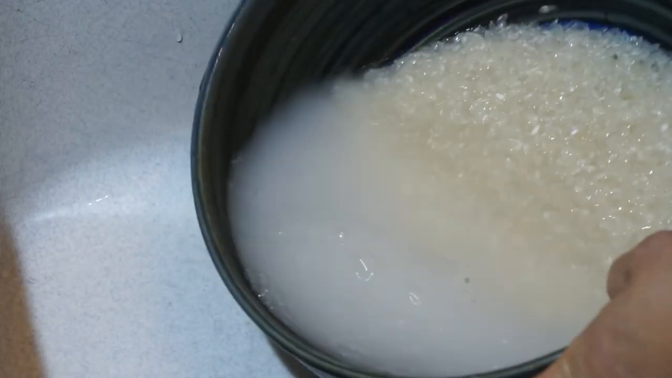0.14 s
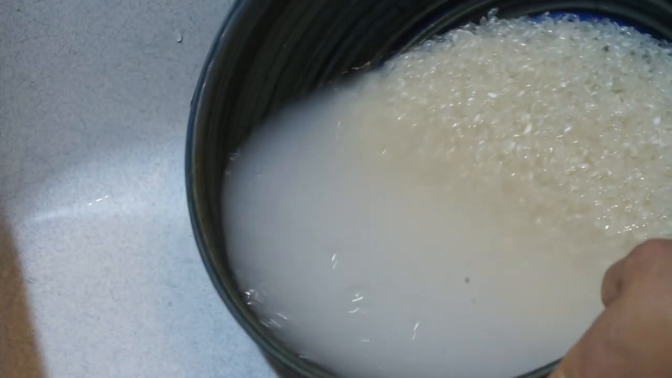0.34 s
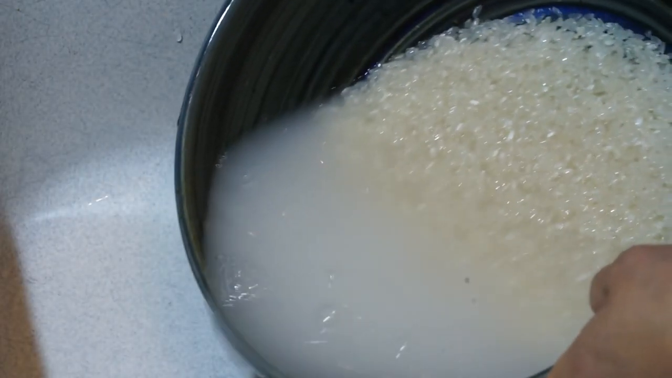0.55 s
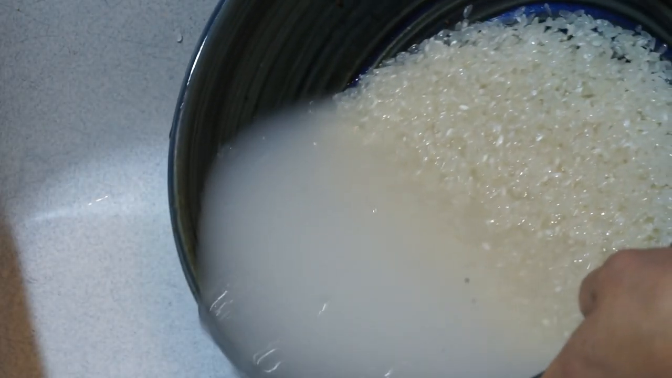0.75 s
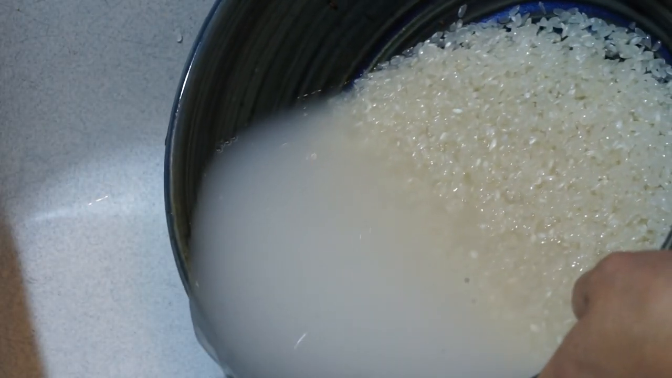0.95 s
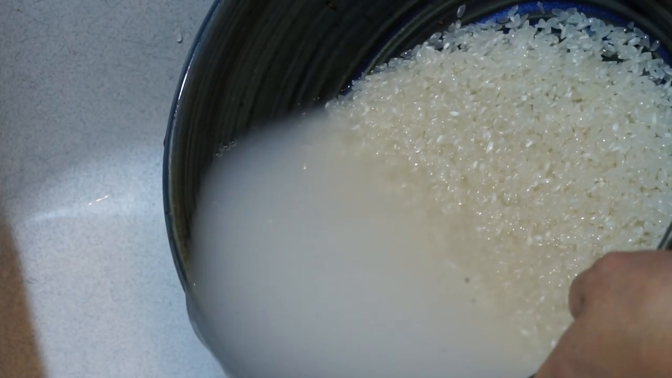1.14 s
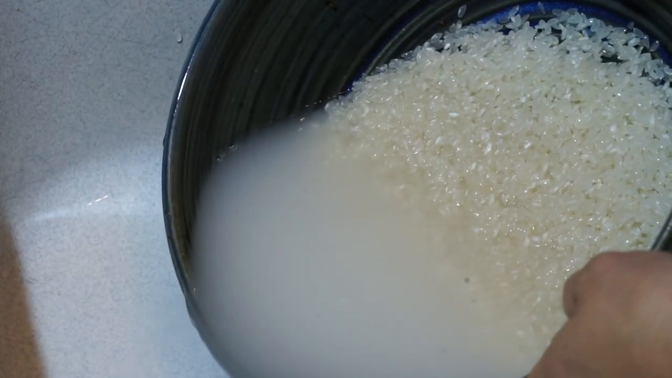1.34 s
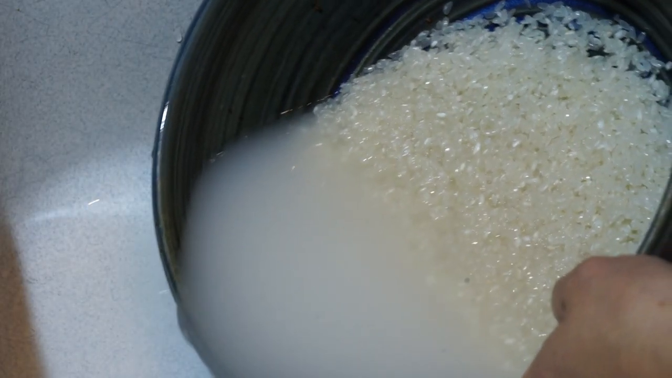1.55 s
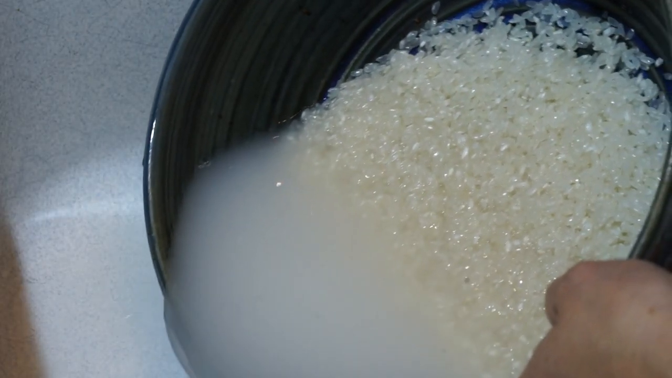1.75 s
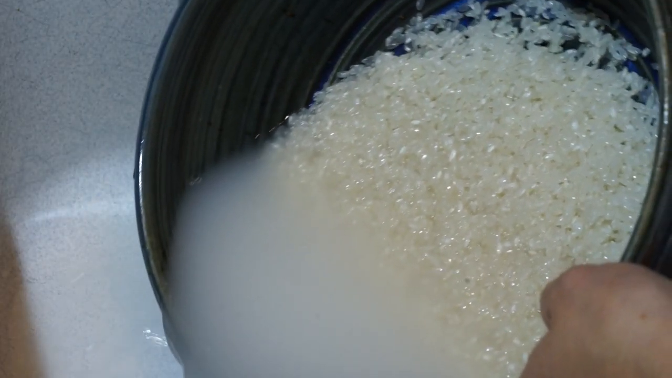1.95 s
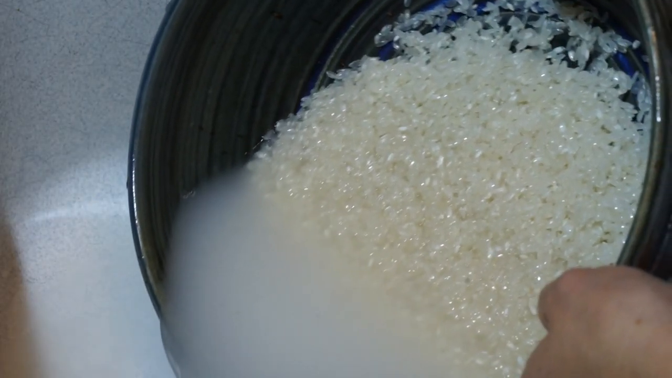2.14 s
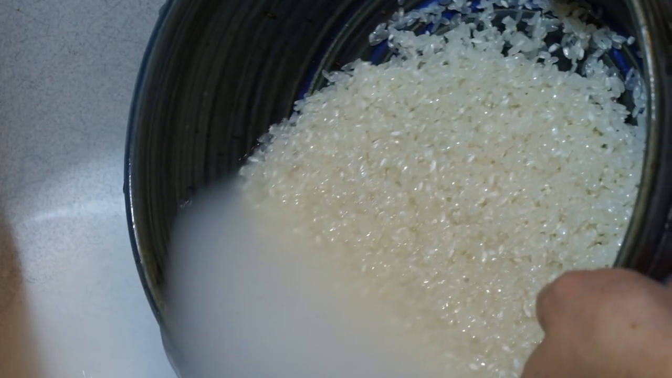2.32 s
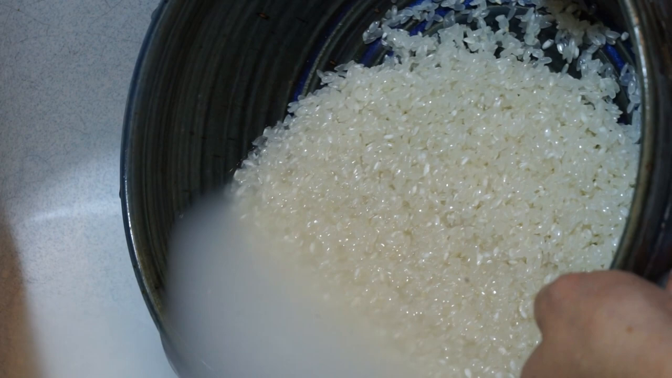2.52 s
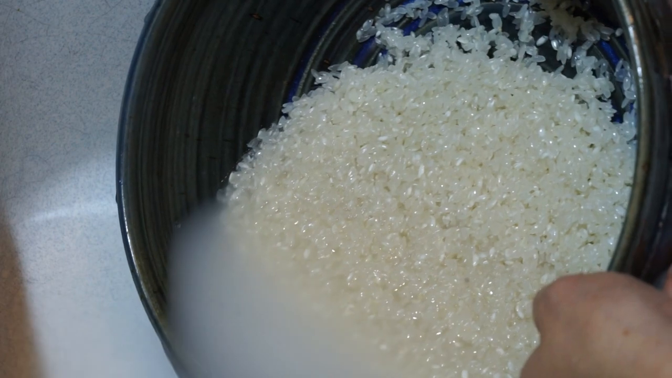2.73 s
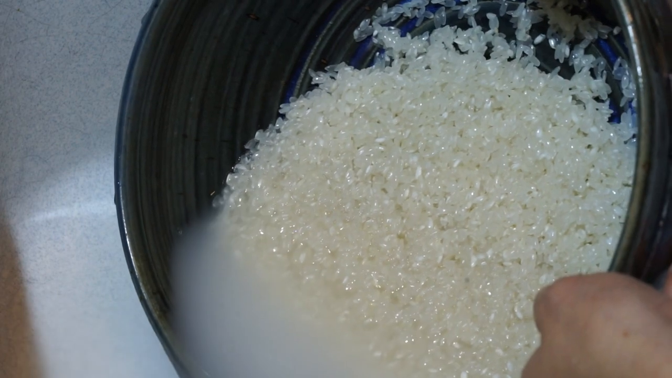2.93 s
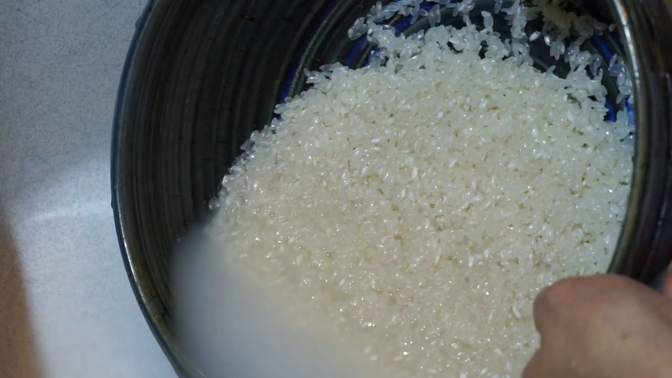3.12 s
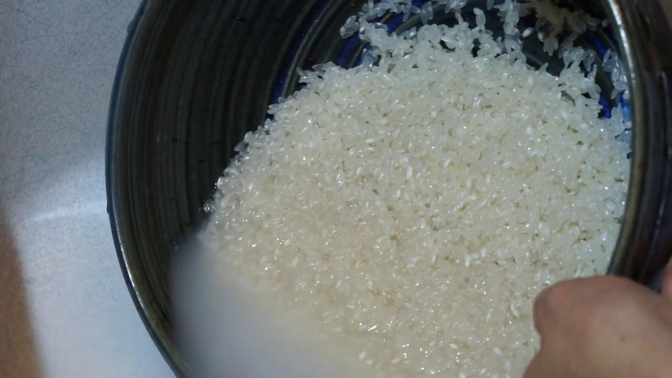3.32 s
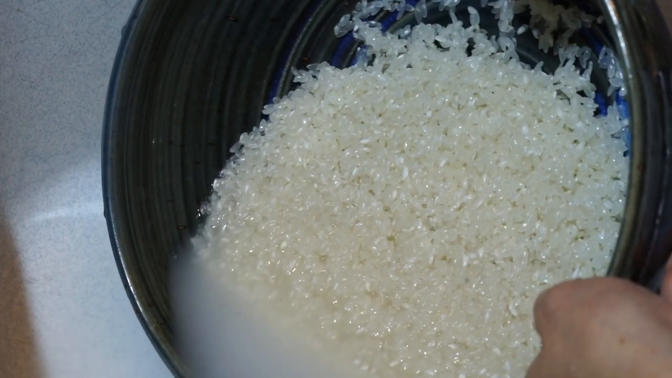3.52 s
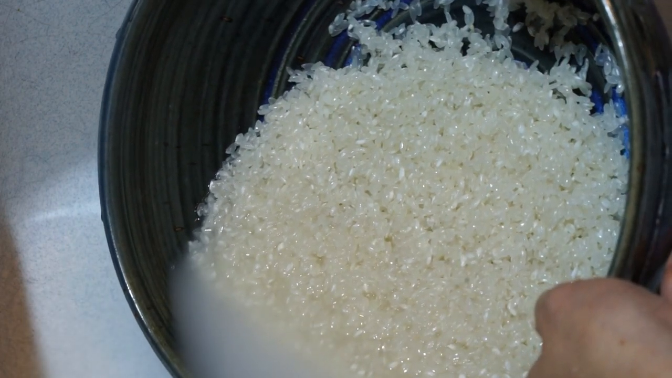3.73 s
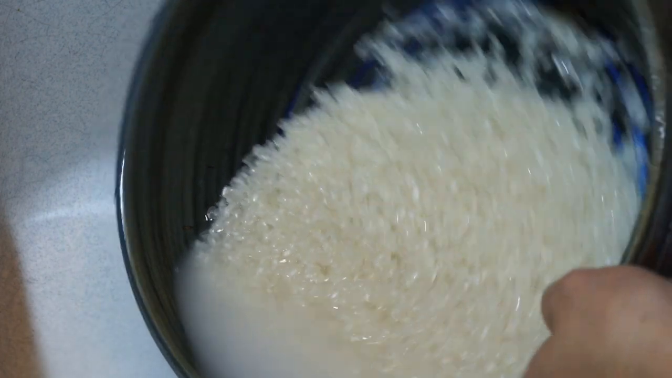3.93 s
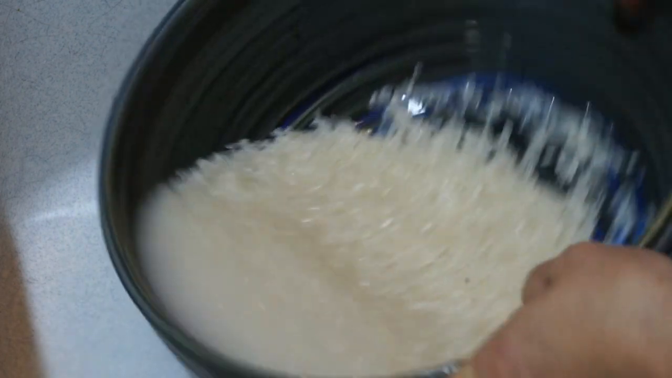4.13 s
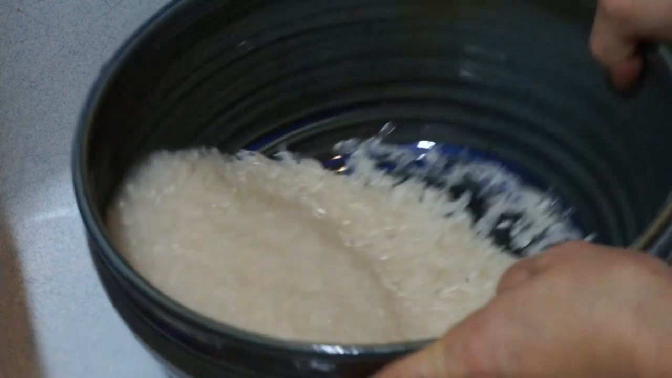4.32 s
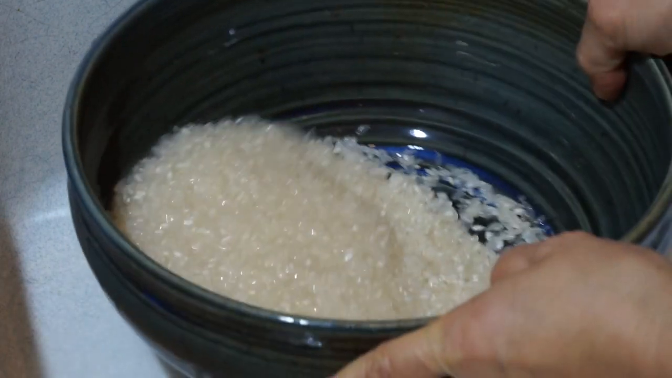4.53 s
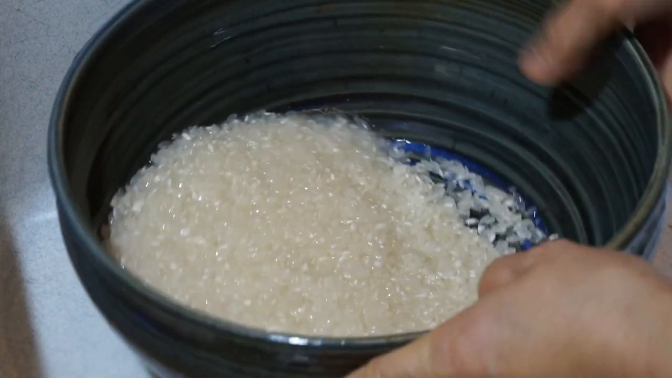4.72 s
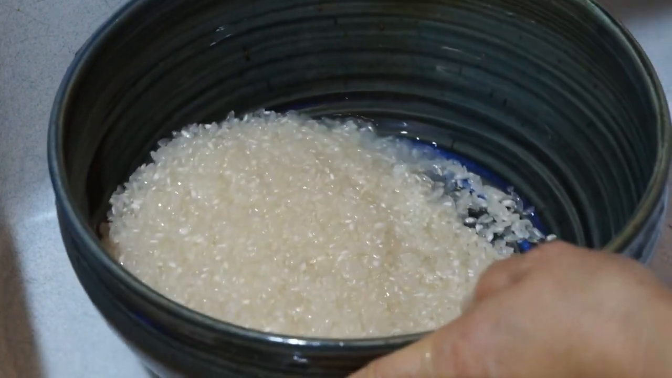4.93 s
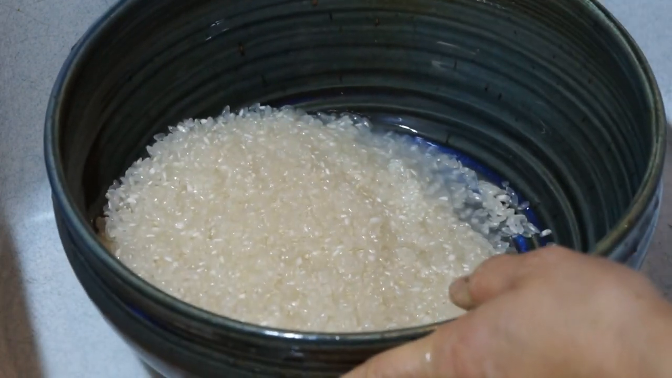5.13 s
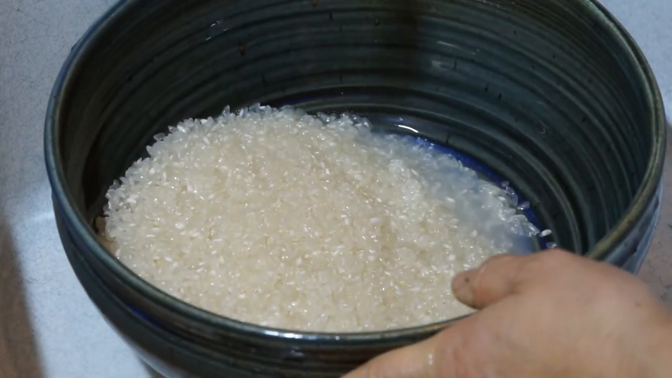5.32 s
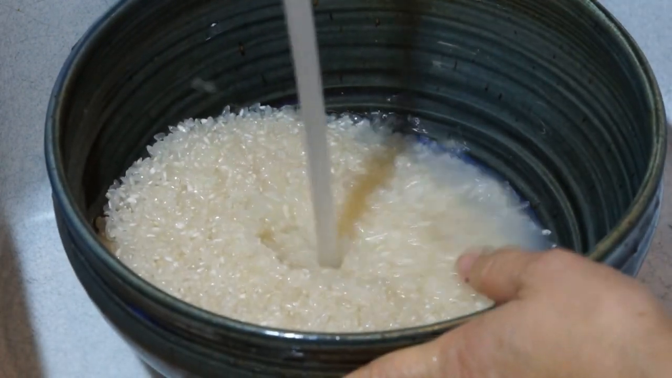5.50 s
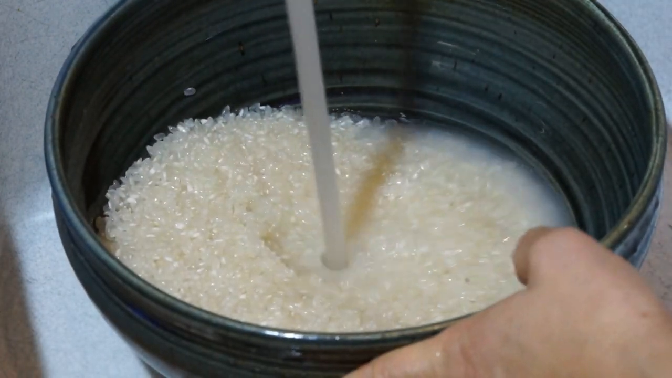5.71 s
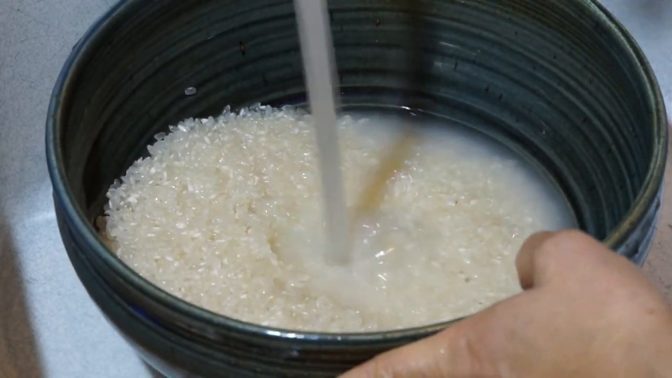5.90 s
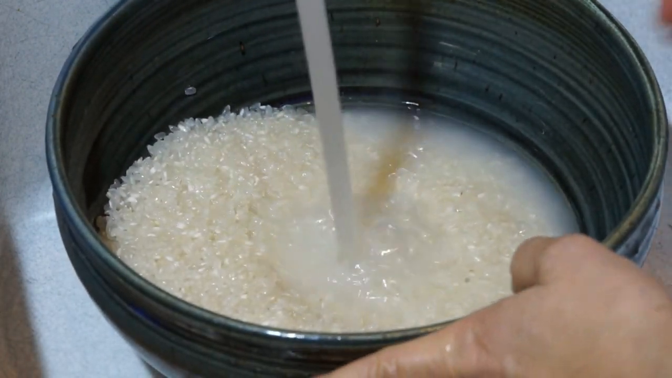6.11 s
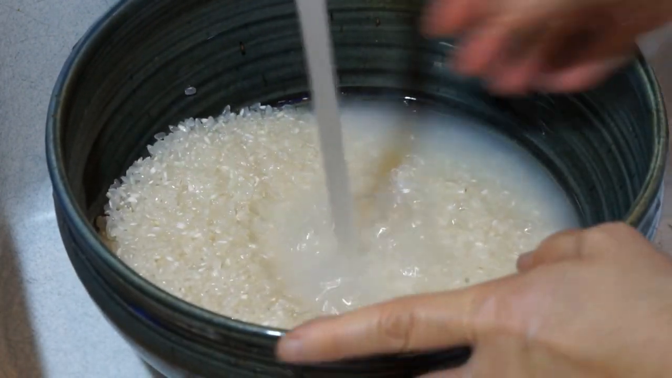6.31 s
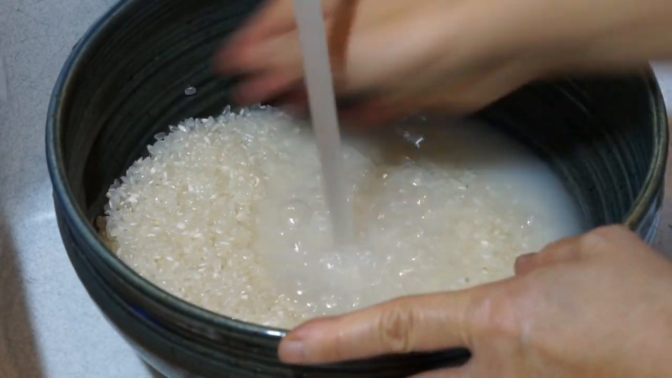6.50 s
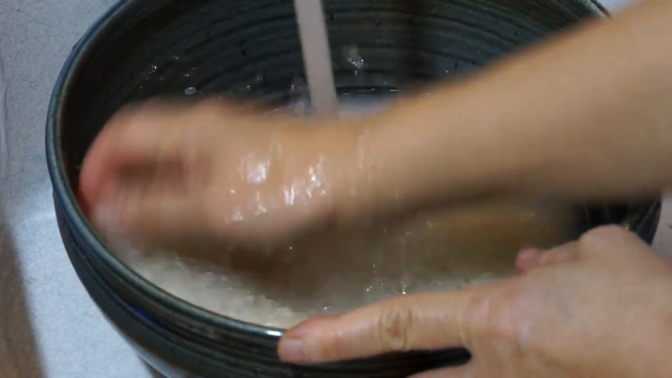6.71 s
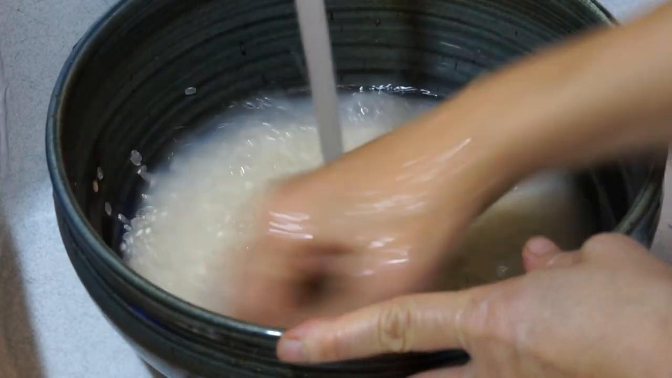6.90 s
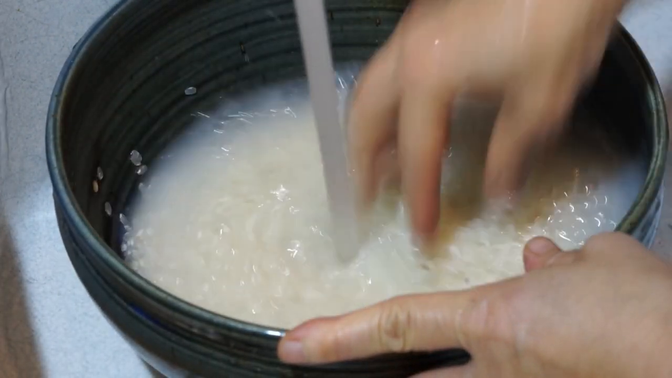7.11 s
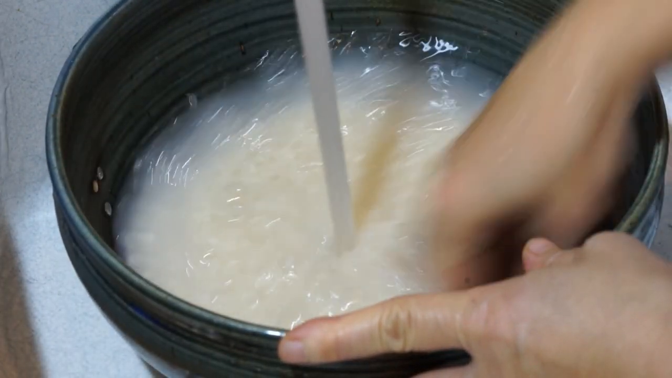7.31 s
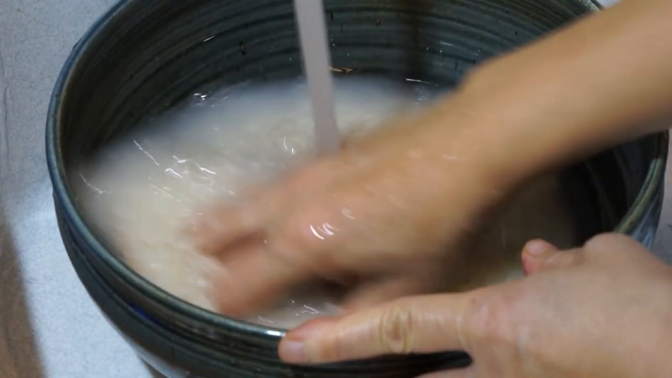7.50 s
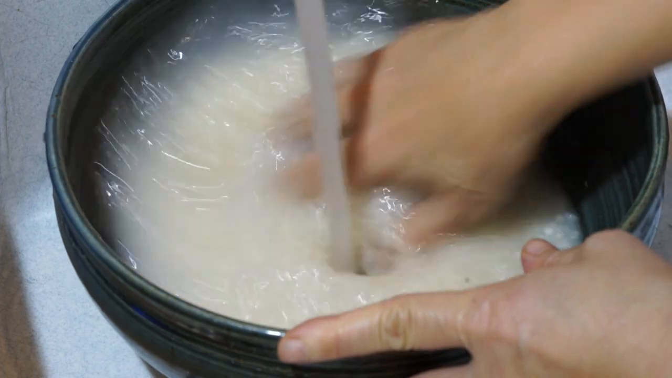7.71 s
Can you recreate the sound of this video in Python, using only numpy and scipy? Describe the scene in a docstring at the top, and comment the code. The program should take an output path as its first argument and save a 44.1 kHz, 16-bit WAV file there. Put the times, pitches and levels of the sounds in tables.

```python
"""Rice water is tipped from a ceramic bowl into a sink: patter, spray, bubbling drops and a gurgling drain.
The bowl knocks and drags on the basin, whose ringing modes are struck by noise and grit.
After a faint tick the tap runs into the rice as hiss, boom and bowl ring; a hand swishes, with splashes.
A close stereo microphone in a quiet kitchen also hears a sine hum that stops, and faint air noise."""
import sys
import numpy as np
from scipy import signal
from scipy.fft import rfft, irfft
from scipy.io import wavfile
from scipy.ndimage import uniform_filter1d

SR = 44100
rng = np.random.default_rng(int(sys.argv[2]) if len(sys.argv) > 2 else 0)


def inscribe(sig):
    """Save sig as 16-bit PCM at rate SR to the path in sys.argv[1].

    A 1-D sig is mono; a 2-D sig holds one channel per row.
    Samples are clipped to [-1, 1] before scaling.
    """
    pcm = np.round(np.clip(np.atleast_2d(sig).T, -1, 1) * 32767)
    wavfile.write(sys.argv[1], SR, pcm.astype(np.int16))


N = 341775

# Water poured close to the microphone, then wet grains slipping; common level of patter, spray and ticks:
# time_s, level_db
POUR = [(0.62, -100), (0.72, -75), (0.98, -59), (1.07, -64), (1.3, -60.5), (1.55, -72.5), (1.75, -62),
        (2.05, -57.5), (2.85, -59), (3.1, -66.5), (3.85, -64), (4.45, -75.5), (5.2, -77)]


def pour():
    """Small drops patter in clumps over a fine spray, with sharp ticks."""
    gate, db = follow(POUR)
    clumps = gain_of(3.5 * evened(uniform_filter1d(rng.standard_normal(N), size=1500)))
    spray_colour = [(600, -5.0), (2500, 1.0), (6000, -7.0), (16000, -14.0)]  # (Hz, dB)
    spray = noise(spray_colour, patchy_db=6, flicker_db=3.0)
    patter = evened(clumps * fizz(900, 6000, per_s=2200, cycles=10, spread_db=3.3))
    sharp = ticks(per_s=70, spread_db=3.2, fade_s=0.02)
    return gate * gain_of(db) * (gain_of(-5) * patter + 0.82 * spray + gain_of(-5) * sharp)


def ticks(per_s, spread_db, fade_s):
    """Droplets burst in the sink: short wide puffs with a sharp start."""
    fade = np.exp(-np.arange(5000) / SR / fade_s)
    bursts = abs(signal.oaconvolve(abs(grit(per_s, spread_db)), fade)[:N])
    puff_colour = [(1500, -17.5), (4000, -2.0), (9000, -7.5), (16000, -7)]  # (Hz, dB)
    return evened(bursts * noise(puff_colour, patchy_db=4.5, flicker_db=6.0))


# Single drops landing in the sink, close by; the last row is a small knock's tick:
# start_s, level_db (of the main bubble or tone), pitch_hz (at its start)
DROPS = [(0.694, -55, 4330), (0.7474, -51, 4400), (0.765, -48, 4920), (0.7955, -46.5, 2820),
         (0.87, -52, 967), (0.9106, -42.5, 1040), (0.925, -45, 4500), (0.9453, -44.5, 1406),
         (0.997, -44, 6700), (1.088, -51, 2660), (1.1488, -47.5, 2000), (1.1697, -40.5, 4970),
         (1.1826, -37.5, 1780), (1.217, -45, 8060), (1.276, -45, 3470), (1.3488, -44.5, 3380),
         (1.38, -47, 8300), (1.4045, -38.5, 1903), (1.43, -39.5, 3520), (1.472, -41, 3970),
         (1.477, -46, 6250), (1.7407, -45, 5000), (1.804, -33.5, 1753), (1.8745, -36.5, 3000),
         (1.8987, -43.5, 2170), (1.9325, -45, 2420), (1.9906, -40.5, 3000), (2.0188, -46, 1230),
         (2.226, -39, 3120), (2.35, -41, 2860), (2.816, -40, 2790), (3.5435, -50, 3040), (3.686, -47, 4110),
         (3.8092, -46.5, 3020), (4.2065, -49, 1760)]


def drops():
    """Drops in the sink ring as bubbles with a very short spray; a small knock's tick, last, is made alike."""
    return plops(DROPS, cycles=7.8, spray_s=0.0015, spray_db=-20, after_db=-3.5)


# Gulps of air down in the drain: start_s, pop_db, hollow_note_db, gurgle_db (levels before shaping)
GLUGS = [(2.22, -51, -58, -63), (2.332, -53, -64, -57), (2.534, -41, -65, -53.5), (2.665, -13, -49, -51),
         (2.791, -28, -86, -53), (2.851, -30, -74, -76), (3.144, -28, -84, -60), (3.55, -33, -68, -77),
         (3.689, -34, -74, -67)]
# Air column of the drain, rung twice over: pitch_hz, width_hz (of each ring)
DRAIN_NOTE = (186, 25)
# Higher tones of the drain pipe, relative to each other: pitch_hz, width_hz (of the narrow ring), level_db
DRAIN_PIPE = [(275, 28, 2), (516, 23, 7.5), (755, 130, 10.5), (870, 32, 10), (967, 47, 9.5),
              (1365, 180, 6.5), (2740, 130, 7.5)]
DRAIN_START_S, DRAIN_END_S, TRICKLE_DB = 2.05, 3.87, -72.5  # steady gurgle under the gulps
GULP_RISE_S, NOTE_FADE_S, GURGLE_FADE_S = 0.0026, 0.13, 0.076


def drain():
    """Each gulp pops, sets the air column of the drain humming and stirs its higher pipe tones."""
    gate = follow([(DRAIN_START_S,), (DRAIN_END_S,)])[0]
    note_hz = DRAIN_NOTE[0]
    breath = evened(ring(ring(grit(1000, 0.57), *DRAIN_NOTE), *DRAIN_NOTE))
    drive = grit(440, 4.13)
    glugs, hollow, churn = np.zeros(N), 0, gain_of(TRICKLE_DB)
    for s, pop_db, note_db, gurgle_db in GLUGS:
        add(glugs, s, gain_of(pop_db) * bubble(530, 1.03, 0.032))
        hollow = hollow + gain_of(note_db) * swell(s, GULP_RISE_S, NOTE_FADE_S)
        churn = churn + gain_of(gurgle_db) * swell(s, GULP_RISE_S, GURGLE_FADE_S)
    pops = drain_pipe(glugs)
    bubbles = fizz(458.3, 1488, per_s=120, cycles=9.9, spread_db=0.65, count=12)
    gurgle = evened(drain_pipe(drive)) + gain_of(-2.5) * bubbles
    hum_note = 0.31 * breath + np.sin(2 * np.pi * note_hz * np.arange(N) / SR)
    return gate * (hollow * hum_note + churn * gurgle) + pops


def drain_pipe(x):
    """Pipe tones: a narrow resonance, rung again through one five times as wide."""
    return sum(gain_of(db) * ring(ring(x, hz, width), hz, 5 * width) / np.sqrt(width)
               for hz, width, db in DRAIN_PIPE)


# Bowl knocking on the basin, close by: start_s, level_db (drive), depth_db (low drive against the rest)
KNOCKS = [(3.894, -38.5, 11.5), (3.928, -37, -13), (3.944, -27.5, 9), (4.007, -18.5, 4.5), (4.29, -28, -6),
          (4.348, -34.5, -18), (4.703, -30, -33), (4.715, -24.5, -36), (4.729, -23.5, -19),
          (4.745, -31, -25), (4.841, -21, -13), (4.85, -22.5, -24), (5.86, -36.5, -8.5),
          (6.859, -32.5, -31)]


def knocks():
    """Each knock is a crack and a rounded blow, then a judder of the foot; the jolted grains rustle after it."""
    blows, deep, grains, cracks = np.zeros((4, N))
    t = np.arange(14000) / SR
    rise = 1 - np.exp(-t / 0.00033)
    for s, db, depth_db in KNOCKS:
        judder = gain_of(-25) * rng.standard_normal(len(t)) * np.exp(-t / 0.008) * rise
        judder[:40] += 0.041 * np.hanning(40)  # the rounded blow
        rustle = rng.standard_normal(len(t)) * np.exp(-t / 0.049) * rise
        crack = rng.standard_normal(len(t)) * np.exp(-t / 0.004)
        add(blows, s, gain_of(db + 74.0) * judder)
        add(deep, s, gain_of(db + depth_db + 75.5) * judder)
        add(grains, s, gain_of(db - 8.5) * rustle)
        add(cracks, s, gain_of(db - 22.5) * crack)
    dull = signal.butter(2, [70, 6000], "band", fs=SR)
    body = signal.lfilter(*dull, basin(blows + gain_of(43.5) * grains, deep))
    return body + gain_of(-31.5) * ring(grains, 3600, 3700) + ring(cracks, 2500, 2230)


# Bowl's foot dragged over the basin, the first stroke already under way:
# start_s, length_s, level_db (of the ringing), depth_db and rasp_db (against the ringing)
DRAGS = [(-0.08, 0.46, -53.5, 1.5, 4), (1.017, 0.058, -57.5, -1.5, 1.5), (1.539, 0.24, -64, 8, 1),
         (4.336, 0.21, -39.5, -15, -12), (4.426, 0.41, -50.5, -11, -3.5), (4.88, 0.27, -55, -9, -34)]
DRAG_PEAK, DRAG_ROUND = 0.35, 2.7  # fastest share of the stroke; roundness of its arch
RUB_HZ, RASP_HZ = 2070, (970, 7000)  # low-pass of the soft rub; band of the rasp


def drags():
    """The rough foot judders over the basin, loudest where the stroke is fastest; the bass swells more broadly."""
    rub = grit(1500, 3)
    still = np.zeros(N)
    rubbed = basin(rub, still)
    ringing = evened(signal.lfilter(*signal.butter(3, RUB_HZ, fs=SR), rubbed))
    low = evened(basin(still, rub))
    scratch = evened(rubbed) + 0.079 * rub  # stirred high modes and bare scratching
    rasp = evened(signal.lfilter(*signal.butter(2, RASP_HZ, "band", fs=SR), scratch))
    out = np.zeros(N)
    for s, length, db, depth_db, rasp_db in DRAGS:
        u = np.clip((np.arange(N) / SR - s) / length, 0, 1)
        arch = abs(np.sin(np.pi * u ** (np.log(.5) / np.log(DRAG_PEAK))))
        speed = arch ** DRAG_ROUND * (u < 1)
        rubbing = speed * (ringing + gain_of(rasp_db) * rasp)
        out += gain_of(db) * (rubbing + gain_of(depth_db) * speed ** 0.51 * low)
    return out


# Ringing modes of sink and bowl: pitch_hz, level_db (relative), decay_s (longest time to fall 60 dB)
BASIN = [(79, -31, 0.38), (108.6, -25.5, 0.27), (195, -22, 0.35), (242, -17.5, 0.29), (291.4, -4.5, 0.12),
         (356.5, -10.5, 0.22), (494, -2, 0.059), (541, -1, 0.11), (640, 4, 0.066), (700, 1, 0.03),
         (861, -8, 0.11), (967, -3.5, 0.027), (1046, 0, 0.02), (1186.6, -10, 0.12), (1634, -5, 0.018),
         (1970, -9, 0.023), (2530, -12, 0.06), (2930, -13, 0.05), (3290, -15.5, 0.04)]


def basin(blows, deep):
    """Modes of sink and bowl ring from rest; deep blows move mostly the low modes."""
    drive = blows + signal.lfilter(*signal.butter(3, 330, fs=SR), deep)
    out = 0
    for hz, db, t60 in BASIN:
        width = max(np.log(1000) / np.pi / t60, hz / 22)  # wet rice damps high modes
        mode = ring(drive, hz, width, np.imag)
        out = out + gain_of(db) * ring(mode, hz, 0.48 * hz) / width
    return out


# Hiss of the tap's jet: pitch_hz, level_db (per Hz, relative)
HISS = [(500, -22), (1200, -6), (2500, 1), (5000, 2.5), (12800, 1), (16000, -3)]
# Broad boom of the jet in bowl and basin: pitch_hz, level_db (per Hz, relative)
BOOM = [(30, -28), (150, -17.5), (270, -9.5), (700, -7.5), (1100, -15.5), (2500, -65)]
# Resonant peaks of that boom: pitch_hz, width_hz, level_db (relative)
BOOM_PEAKS = [(306, 76, -14.5), (512.5, 39, -6), (652, 11, -4)]
# Ring of the bowl's wall under the jet: pitch_hz, width_hz (of the narrow ring), level_db (relative)
BOWL = [(1896, 98, 9.5), (1980, 27, 13.5), (2127, 130, 9.5), (3026, 147, 4)]
# Balance of the tap between the microphone's sides: pitch_hz, left_over_right_db
LEAN = [(300, 0), (3800, 1), (15000, -4)]


def tap():
    """The aerated jet hisses and fizzes, booms in the bowl and basin, and rings the bowl's wall."""
    gate, hiss_db, boom_db = flow()
    froth = fizz(2500, 9000, per_s=2500, cycles=6, spread_db=4)
    hiss = noise(HISS, patchy_db=2.5, flicker_db=1.0) + gain_of(-15.5) * froth
    thud = grit(1500, 2.7)
    clumps = gain_of(3.8 * evened(uniform_filter1d(rng.standard_normal(N), size=1200)))
    pelt = grit(500, 3.5) * clumps
    boom = evened(sum(gain_of(db) * ring(thud, hz, width) for hz, width, db in BOOM_PEAKS))
    boom = boom + gain_of(-3.5) * noise(BOOM, patchy_db=4.0, flicker_db=-3.0)
    wall = evened(sum(gain_of(db) * ring(ring(pelt, hz, width), hz, 4 * width) for hz, width, db in BOWL))
    wall_db = (hiss_db + boom_db) / 2 - 4.5
    jet = gain_of(hiss_db) * hiss + gain_of(boom_db) * boom + gain_of(wall_db) * wall
    lean = [[(hz, side * db / 2) for hz, db in LEAN] for side in (1, -1)]
    return np.array([coloured(gate * x, points) for x, points in zip(jet, lean)])


# The jet or the hand throws water about in the bowl:
# start_s, hiss_rise_db, boom_rise_db (both before the swell shapes them), fade_s
SURGES = [(5.425, 14, 5, 0.05), (5.876, 8, 11.5, 0.036), (5.958, 11, -1.5, 0.039),
          (6.462, 13.5, 1.5, 0.047), (6.603, 10, -6, 0.17), (6.814, 15.5, -6, 0.021), (6.956, 4, 5, 0.13),
          (7.079, 8.5, 2.5, 0.045), (7.307, 0.5, 4.5, 0.28), (7.48, 7.5, -3.5, 0.43), (7.74, 13, -53, 0.2)]
TAP_OPENS_S, OPENING_S, JET_LANDS_S = 5.19, 0.07, 5.433
SPOUT_DB, JET_DB, JET_GAIN_DB_PER_S = -55, -49, 3  # hiss of the spout alone; of the landing jet, growing
BOOM_START_DB, BOOM_FULL_DB, FILL_S = -62.5, -50.5, 0.21  # the boom grows as water covers the rice
SURGE_RISE_S = 0.01


def flow():
    """Opening of the tap, and the levels of hiss and boom as the jet lands and the bowl fills."""
    t = np.arange(N) / SR
    landed = np.maximum(t - JET_LANDS_S, 0)
    opening = np.clip((t - TAP_OPENS_S) / OPENING_S, 0, 1) ** 2
    hiss_db = np.where(landed > 0, JET_DB + JET_GAIN_DB_PER_S * landed, SPOUT_DB)
    boom_db = BOOM_FULL_DB + (BOOM_START_DB - BOOM_FULL_DB) * np.exp(-landed / FILL_S)
    for s, spray_db, slosh_db, fade_s in SURGES:
        surge = swell(s, SURGE_RISE_S, fade_s)
        hiss_db = hiss_db + spray_db * surge
        boom_db = boom_db + slosh_db * surge
    return opening, hiss_db, boom_db


# A faint tick before the tap opens, then splashes in the bowl, close by:
# start_s, level_db (of the main bubble or tone), pitch_hz (at its start)
SPLASHES = [(5.1402, -55, 3490), (5.435, -29, 1850), (5.493, -28.5, 2920), (5.7389, -33, 2280),
            (5.8872, -30.5, 2090), (6.4517, -32, 2320), (6.81, -31, 3220), (6.8565, -31, 2100),
            (6.985, -27, 4450), (7.1014, -31.5, 2160), (7.183, -30.5, 4520), (7.5023, -28, 1750)]


def tick_and_splashes():
    """A faint tick, then splashes whose bubbles ring more briefly than the drops, with a longer spray."""
    return plops(SPLASHES, cycles=5.5, spray_s=0.0038, spray_db=-25, after_db=-3.5)


def hum():
    """An appliance hums as a steady sine until it switches off."""
    hum_hz, level_db, stops_s = 105.4, -74, 2.4
    t = np.arange(N) / SR
    gate = np.clip((stops_s - t) / 0.029, 0, 1)
    return gate * gain_of(level_db) * np.sqrt(2) * np.sin(2 * np.pi * hum_hz * t)


# Reverberation of the kitchen: pitch_hz, decay_s (time to fall 60 dB)
KITCHEN = [(100, 0.039), (2000, 0.15), (16000, 0.17)]


def kitchen(x):
    """Sparse echoes of random sign, each band dying at its own speed, other echoes on each side."""
    echoes = np.zeros((2, SR // 2))
    slots = np.arange(100, SR // 2 - 20, 20)
    at = slots + rng.integers(0, 20, (2, len(slots)))
    np.put_along_axis(echoes, at, rng.choice([-1., 1.], (2, len(slots))), 1)
    hz, t, z = signal.stft(echoes, SR, nperseg=256)
    fading = z * gain_of(-60 * t / read(KITCHEN, hz)[:, None])
    tail = signal.istft(fading, SR, nperseg=256)[1]
    tail = signal.lfilter(*signal.butter(1, 500, "high", fs=SR), tail)  # keeps unlike bass out of the sides
    return signal.oaconvolve(x[None], tail / np.linalg.norm(tail[0]), axes=1)[:, :N]


# Quiet air of the kitchen around the microphone: pitch_hz, level_db (per Hz, relative)
AIR = [(20, -7), (90, -7), (300, -7.5), (600, -12.5), (3200, -22), (16000, -30.5)]


def air():
    """Faint broad noise, strongest in the bass."""
    return gain_of(-73.5) * noise(AIR, patchy_db=2, flicker_db=.5)


# Likeness of noise at the left and right of the microphone: pitch_hz, likeness (1 is identical)
SAME = [(200, 0.98), (1000, 0.56), (4000, 0.47), (15000, 0.37)]


def noise(points, patchy_db, flicker_db):
    """Two-channel noise from random short-time spectra, with drifting patches and wide flicker."""
    frames, hz = N // 128 + 5, np.fft.rfftfreq(512, 1 / SR)
    a, b, c, d, patches = rng.standard_normal((frames, 257, 5)).T
    patches = uniform_filter1d(patches, size=10, axis=0)
    patches = evened(uniform_filter1d(patches, size=10, axis=1))
    flicker = evened(uniform_filter1d(rng.standard_normal(frames), size=3))
    like = np.clip(read(SAME, hz), -1, 1)[:, None]
    left = a + 1j * b
    right = like * left + np.sqrt(1 - like ** 2) * (c + 1j * d)
    z = np.array([left, right]) * gain_of(patchy_db * patches + flicker_db * flicker)
    sound = signal.istft(z, nperseg=512, noverlap=384)[1][:, :N]
    return evened(coloured(sound, points))


def plops(rows, cycles, spray_s, spray_db, after_db):
    """Each row gives a bubble, a spray stirred at or above its pitch and eight quieter bubbles soon after."""
    out, t = np.zeros(N), np.arange(5000) / SR
    for (s, db, hz), chance in zip(rows, rng.random((len(rows), 2, 8))):
        fade = np.exp(-t / spray_s) + 0.3 * np.exp(-t / 0.02)
        spray = signal.lfilter([1, -0.75], [1], rng.standard_normal(len(t))) * fade
        spray_hz = min(hz * 3 ** chance[1, 0], 12000)
        spray = spray + 0.79 * ring(spray, spray_hz, 0.39 * hz)
        add(out, s, gain_of(db) * bubble(hz, cycles, 0.0092))
        add(out, s, gain_of(db + spray_db) * spray)
        for late, size in chance.T:
            after_hz = hz * 2.6 ** (size - .25)
            after = gain_of(db + after_db - 16.0 * late) * bubble(after_hz, cycles, 0.012)
            add(out, s + 0.045 * late, after)
    return out


def fizz(lo_hz, hi_hz, per_s, cycles, spread_db, count=30):
    """Many small bubbles at random times; each pitch has a random place left and right."""
    out = np.zeros((2, N))
    for hz in np.geomspace(lo_hz, hi_hz, count):
        starts = grit(per_s / count, spread_db)
        one = signal.oaconvolve(starts, bubble(hz, cycles * rng.uniform(0.46, 3.0), 0.0072))[:N]
        out += evened(one) * gain_of(rng.uniform(-10.5, 9.1) * np.array([[1], [-1]]))
    return evened(out)


def bubble(hz, cycles, glide):
    """A bubble rings briefly, its pitch rising as it nears the surface."""
    u = np.arange(round(4 * cycles / hz * SR)) / SR * hz / cycles
    tone = np.sin(2 * np.pi * cycles * u * (1 + glide * u / 2))
    return tone * np.exp(-u) * (1 - np.exp(-u * 8))


def grit(per_s, spread_db):
    """Sparse clicks of random sign; a few are large."""
    size = gain_of(spread_db * np.minimum(rng.exponential(1, N), 5))
    return evened(size * np.sign(rng.standard_normal(N)) * (rng.random(N) < per_s / SR))


def ring(x, hz, width, part=np.real):
    """A fixed resonance of gain 1; its imaginary part starts from rest, as a struck mode does."""
    r = np.exp(-np.pi * width / SR)
    return 2 * part(signal.lfilter([1 - r], [1, -r * np.exp(2j * np.pi * hz / SR)], x))


def swell(s, rise_s, fade_s):
    """A quick rise at time s and a slower fade."""
    t = np.maximum(np.arange(N) / SR - s, 0)
    return (1 - np.exp(-t / rise_s)) * np.exp(-t / fade_s)


def coloured(x, points):
    """Gives x the colour of a spectrum table."""
    size = 2 ** 19
    return irfft(rfft(x, size) * gain_of(read(points, np.fft.rfftfreq(size, 1 / SR))))[..., :N]


def read(points, hz):
    """Value of a spectrum table at hz, on a logarithmic pitch scale."""
    f, value = np.transpose(points)
    return np.interp(np.log(hz + 1), np.log(f + 1), value)


def follow(rows):
    """A gate that is open inside a curve table, with 20 ms edges, and its columns at every sample."""
    s, *columns = np.transpose(rows)
    t = np.arange(N) / SR
    after_start = t - s[0] + (s[0] < .001)  # no fade where the table meets the scene's start or end
    before_end = s[-1] - t + (s[-1] > N / SR - .03)
    gate = np.clip(np.minimum(after_start, before_end) / .02, 0, 1)
    return gate, *(np.interp(t, s, c) for c in columns)


def add(mix, s, sound):
    """Lays a sound into the mix at time s."""
    part = mix[round(s * SR):][:len(sound)]
    part += sound[:len(part)]


def gain_of(db):
    """Decibels to a factor."""
    return 10 ** (np.asarray(db) / 20)


def evened(x):
    """Scales to rms 1."""
    return x / np.sqrt(np.mean(x ** 2) + 1e-20)


def scene():
    """Near sources with their room, over the steady water and air."""
    small = drops() + tick_and_splashes()
    solid = knocks() + drags()
    room = gain_of(-1.0) * kitchen(small) + gain_of(-3.5) * kitchen(solid)
    near_solid = solid * gain_of([[.6], [-.6]])  # slightly louder on the left
    return pour() + small + drain() + near_solid + tap() + room + hum() + air()


def record(dry):
    """The microphone's bass roll-off and the band limit of the recorder."""
    dry = signal.lfilter(*signal.butter(1, 40, "high", fs=SR), dry)
    band_limit = signal.firwin(511, 15850, window=("kaiser", 9), fs=SR)  # low-pass at 15850 Hz
    return signal.oaconvolve(dry, band_limit[None], "same")


dry = scene()
out = record(dry)
inscribe(out)
```